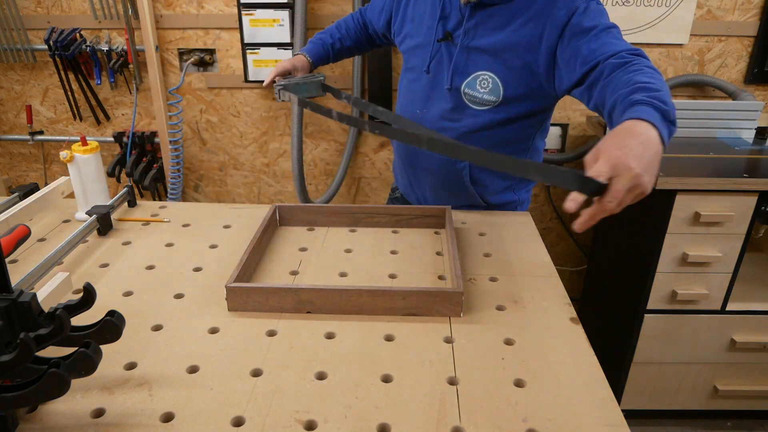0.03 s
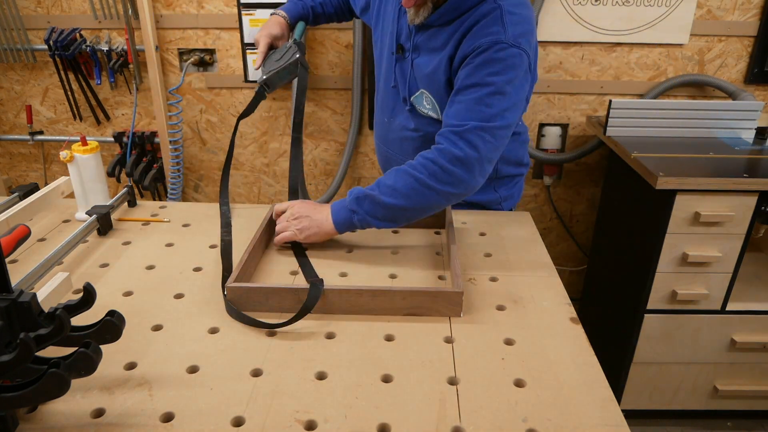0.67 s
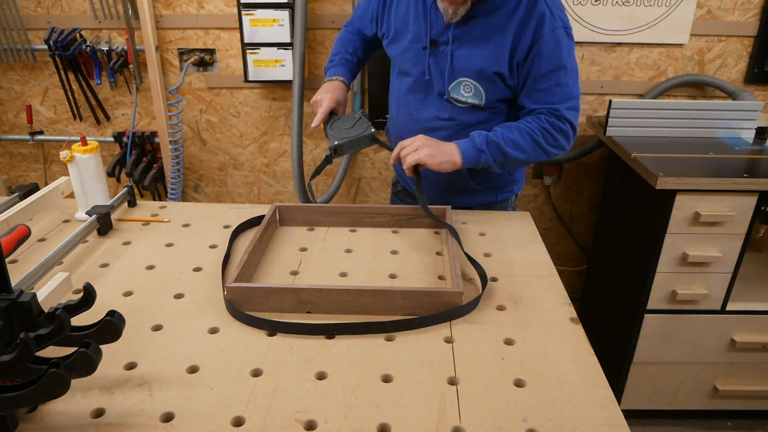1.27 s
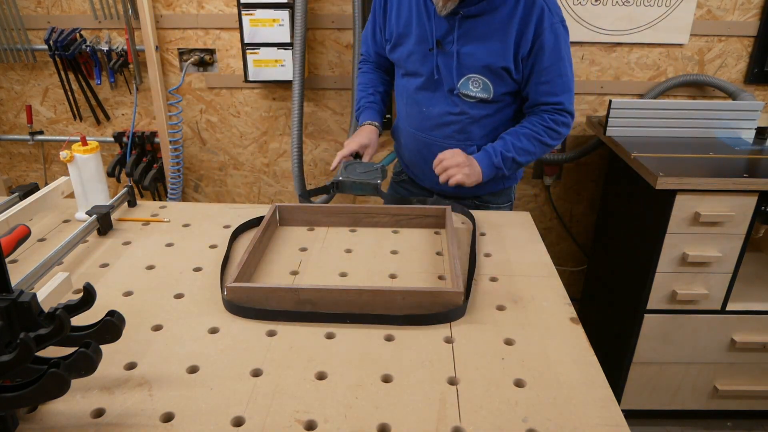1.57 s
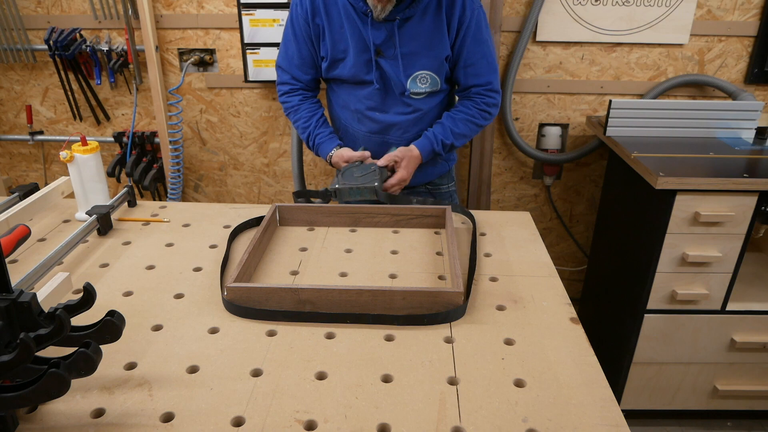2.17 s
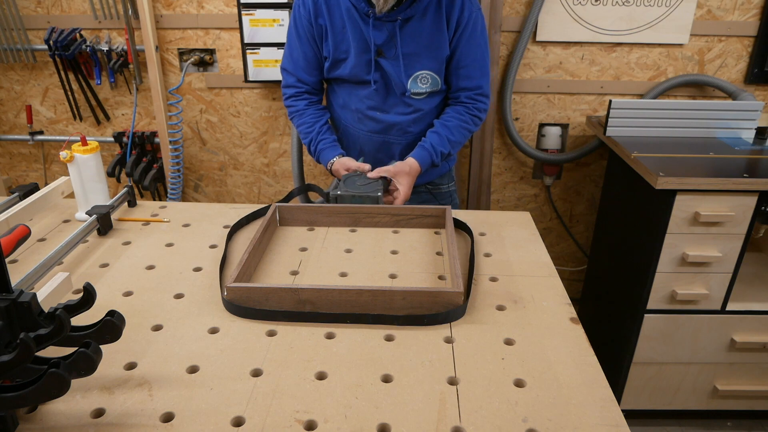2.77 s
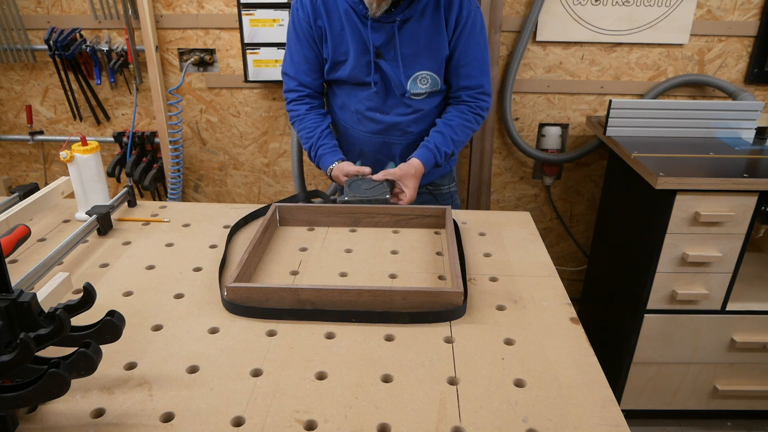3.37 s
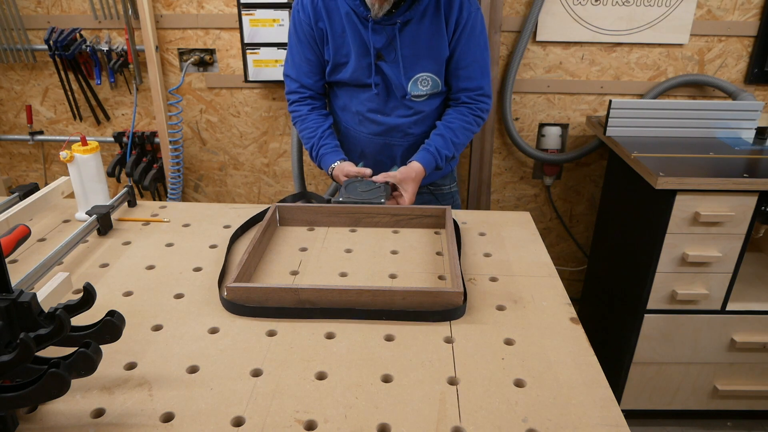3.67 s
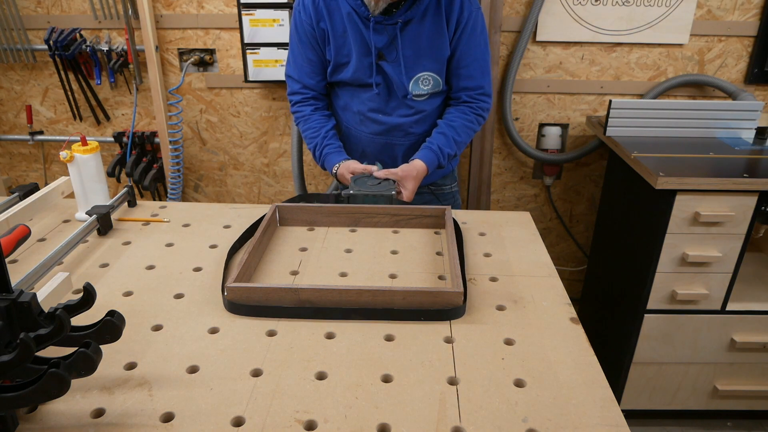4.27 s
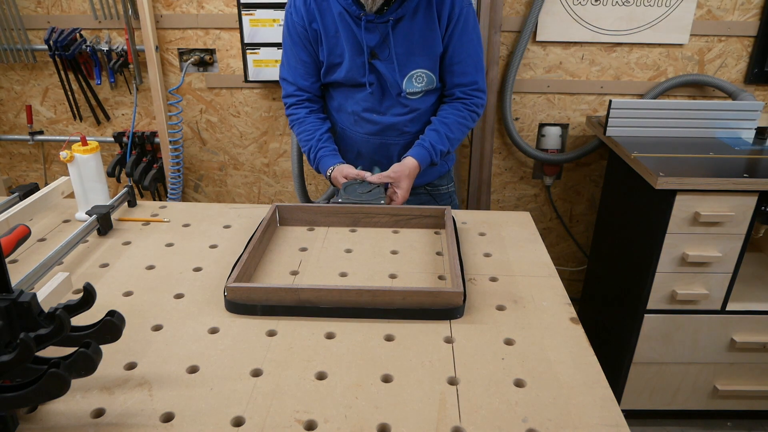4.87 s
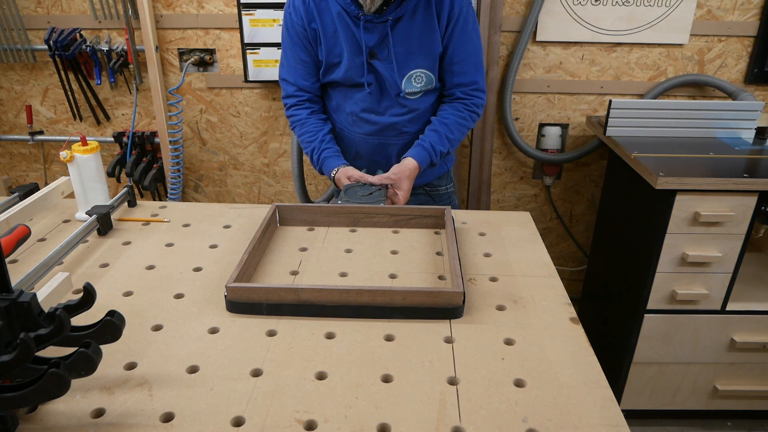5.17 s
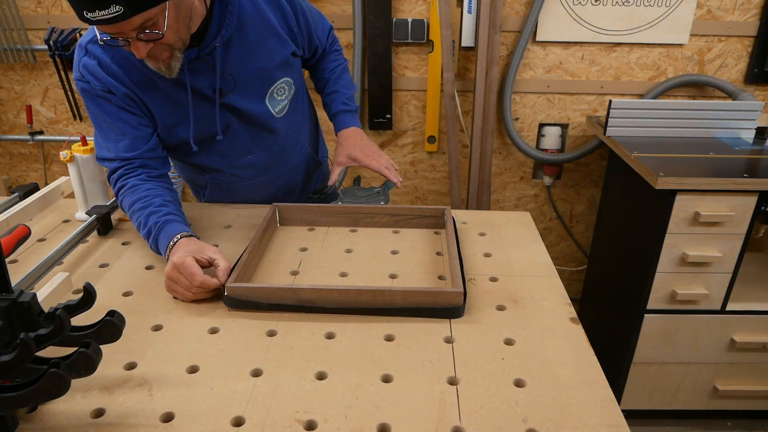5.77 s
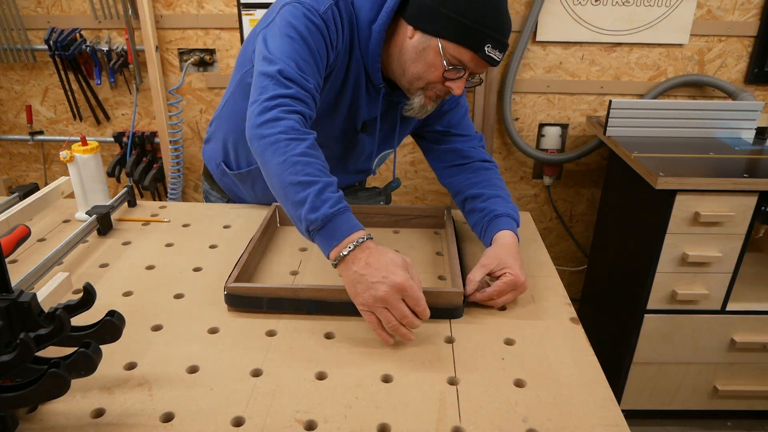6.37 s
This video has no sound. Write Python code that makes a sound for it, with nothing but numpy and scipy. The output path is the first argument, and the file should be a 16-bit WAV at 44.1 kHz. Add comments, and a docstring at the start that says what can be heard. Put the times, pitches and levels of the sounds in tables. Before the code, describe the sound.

A strap swishes around a wooden frame, then a plastic ratchet tightens it with rapid, slowing clicks and light wooden knocks.

```python
"""A strap clamp is tightened round a glued wooden frame, heard from close by in a small workshop.
First sleeves rustle, the strap slides and swishes, and hands pat the wood. After about two seconds
the ratchet winds the strap in: its pawls (small catches) snap over teeth in a fast rattle that slows
as the strap tightens, while the frame drags and knocks on the bench. Then single clicks lock the
clamp, the frame knocks once more, a corner block is tapped against it, and hands pat it again."""
import sys
import numpy as np
from scipy import signal
from scipy.fft import rfft, irfft, next_fast_len
from scipy.io import wavfile

SR = 44100
rng = np.random.default_rng(int(sys.argv[2]) if len(sys.argv) > 2 else 0)


def transcribe(u):
    """Save the signal u as a 16-bit wav file named by the first command-line argument.

    u: samples, shape (n,) or (channels, n), limited to [-1, 1]; the rate is SR.
    q: integer samples, one column per channel.
    """
    v = np.clip(np.atleast_2d(u).T, -1, 1)
    q = np.round(v * 32767).astype(np.int16)
    wavfile.write(sys.argv[1], SR, q)


N = 283541

# The spool winds the strap in, in two runs. One list for each run: time_s, turns_made
SPOOL_RUNS = [
    [(2.265, 0), (2.355, 1), (2.429, 2), (2.661, 5), (2.746, 6), (2.821, 7), (3.039, 10), (3.11, 10.98)],
    [(3.251, 0), (3.405, 2), (3.562, 4), (3.861, 8), (4.18, 12), (4.265, 13), (4.357, 14), (4.464, 15),
     (4.591, 16)],
]
# Every turn trips the pawls in the same order, a loose three and a tight pair: share_of_turn, level_db
TEETH_PER_TURN = [(-0.085, -5), (0, 1.5), (0.115, -2.5), (0.49, -2.5), (0.538, -2.5)]
# The force of the winding, as the energy of a snap: time_s, level_db
WINDING_FORCE = [(2.26, -5), (2.65, -9), (3.1, -11), (3.7, -12), (4.3, -12), (4.75, -12)]
# Single snaps as the clamp is handled, stalls and is locked: start_s, level_db
SINGLE_SNAPS = [(1.62, -27), (1.854, -26.5), (1.9772, -14.5), (2.026, -16), (2.034, -6.5), (2.1139, -7),
                (2.18, -21), (2.221, -15), (3.1225, -9), (3.172, -26), (3.2274, -12), (4.612, -11),
                (4.6591, -11), (4.6628, -11.5), (4.7404, -9.5), (4.8407, -9), (4.9012, -14.5),
                (4.9101, -12.5), (5.0349, -6), (5.1524, -7.5), (5.2038, -7.5), (5.2313, -10.5),
                (5.507, -22)]
# The tones of a snap in the plastic clamp (ring_s is the time to fade by 60 dB): pitch_hz, level_db, ring_s
PAWL_TONES = [(1900, -23, 0.0023), (2080, -12.5, 0.0037), (3284, -2.5, 0.0025), (4905, -0.5, 0.0027),
              (5770, 3.5, 0.0016), (6510, -5, 0.0047), (7940, -6.5, 0.00068), (10200, -4.5, 0.0013),
              (13060, -14.5, 0.0021), (13900, -6, 0.0012)]
# The snaps grow brighter and duller over time: time_s, treble_lift_db_per_octave
SNAP_BRIGHTNESS = [(2.0, -3.5), (2.6, 1.5), (3.4, 0), (4.3, -1), (4.8, 2.5), (5.2, 1)]
# The longer ring of the clamp's housing: pitch_hz, level_db, ring_s
HOUSING_TONES = [(1514, -48, 0.055), (2210, -41, 0.034), (3211, -40, 0.05), (3466, -41, 0.06),
                 (3550, -40.5, 0.06), (3666, -39, 0.06), (3757, -40, 0.06), (5243, -39, 0.03),
                 (5492, -39, 0.03), (6400, -39, 0.035)]
# A pawl scraping up a tooth. Each _NOISE table gives the shape of a noise: pitch_hz, level_db
SCRAPE_NOISE = [(400, -18.5), (2000, 6.5), (5500, 5), (8000, 5.5), (16000, -6)]

# The frame jumps and knocks on the bench: start_s, level_db
FRAME_KNOCKS = [(2.422, -36.5), (2.449, -41.5), (2.493, -35.5), (2.511, -46), (2.573, -41), (2.623, -43),
                (2.831, -41.5), (2.901, -46.5), (2.927, -44), (3.337, -43.5), (3.414, -47), (3.756, -53.5),
                (5.279, -36)]
# Hands and strap land softly on frame and bench: start_s, thud_db, slap_db
SOFT_PATS = [(0.504, -53.5, -43.5), (0.553, -52.5, -59), (0.604, -72, -54), (0.635, -56.5, -52),
             (0.948, -75, -50), (1.541, -73, -48.5), (1.773, -64, -65), (5.507, -54, -46),
             (6.115, -48.5, -62), (6.14, -54, -52.5), (6.184, -58, -56)]
# A corner block is set against the frame: start_s, level_db
BLOCK_TAPS = [(5.706, -58), (5.724, -58.5), (5.796, -50)]
# Dull bumps against the bench: start_s, level_db
BENCH_BUMPS = [(0.551, -63), (5.368, -61), (6.024, -61)]
# The tones that frame, bench top and block ring with: pitch_hz, level_db, ring_s
FRAME_TONES = [(236.8, -20, 0.31), (495.3, -5, 0.08), (775, -12, 0.17), (925, -14, 0.22), (1004, -2, 0.13),
               (1240, -10, 0.071), (1403, 1.5, 0.054), (1654, 2, 0.049), (2058, -2, 0.041),
               (2320, -4, 0.047), (2510, -27, 0.06), (2820, -17, 0.04)]
BENCH_TONES = [(177, -1.5, 0.03), (260.5, -4, 0.048), (348, -0.5, 0.078), (440, -4.5, 0.052),
               (655, 0, 0.12)]
BLOCK_TONES = [(735, -12, 0.24), (963, -1.5, 0.11), (1110, -17, 0.077), (1400, 5.5, 0.037),
               (1840, 2, 0.017), (2730, -7, 0.046)]
# The noisy parts of these hits: pitch_hz, level_db
FRAME_NOISE = [(400, -41), (750, -5), (1400, -2), (2200, 4), (3000, -10), (5000, -15)]
THUD_NOISE = [(110, -45), (240, -14), (480, 6.5), (700, -18), (1400, -11)]
CRACK_NOISE = [(1800, 0), (3000, -6.5), (4000, -2), (6000, -5), (16000, -26.5)]
SCUFF_NOISE = [(700, 4), (1400, 2), (2800, -10), (5000, -17), (8200, -9), (10000, -16)]
BUMP_NOISE = [(90, -16), (140, 8), (300, -6)]
# The strap drags the frame over the bench: time_s, level_db
FRAME_DRAG = [(2.38, -100), (2.45, -58), (2.6, -50.5), (2.72, -78), (2.84, -59.5), (2.97, -61.5),
              (3.2, -76.5), (3.33, -61.5), (3.5, -72.5), (3.87, -66), (4.08, -82), (4.5, -102)]

# Sleeves brush as the arms move: time_s, level_db
ARM_MOVES = [(0.0, -62.5), (0.27, -63.5), (0.37, -70.5), (0.62, -61.5), (0.76, -66.5), (1.0, -66.5),
             (1.13, -62.5), (1.5, -67.5), (1.72, -61.5), (2.4, -67), (3.1, -76), (5.15, -76.5), (5.32, -66),
             (5.64, -71.5), (5.86, -73.5), (6.02, -61.5), (6.42, -70)]
# The strap is drawn through the housing and whistles when fast: start_s, length_s, slide_db, whistle_db
STRAP_SLIDES = [(0.0, 0.11, -56.5, -58), (0.573, 0.14, -62, -68), (0.787, 0.092, -57.5, -75),
                (0.954, 0.027, -66, -70), (1.08, 0.19, -63.5, -60.5), (1.402, 0.065, -59.5, -84),
                (1.684, 0.15, -56.5, -58.5), (1.913, 0.16, -55.5, -66.5), (5.508, 0.081, -70, -61.5)]
# The strap is swept over hands and bench: start_s, length_s, level_db
STRAP_SWISHES = [(0.0, 0.096, -63), (0.235, 0.016, -57), (0.47, 0.062, -54), (0.58, 0.13, -62),
                 (0.86, 0.022, -62), (1.07, 0.034, -55), (1.19, 0.074, -57.5), (1.34, 0.021, -60),
                 (1.38, 0.029, -55), (1.57, 0.07, -58.5), (1.71, 0.14, -59.5), (2.15, 0.16, -59),
                 (5.41, 0.11, -56.5), (5.69, 0.044, -67.5), (6.01, 0.24, -63)]
# The rubbing noises: pitch_hz, level_db
SLEEVE_NOISE = [(100, -15.5), (170, -6.5), (300, 0), (600, 1), (1200, 2), (1700, 0.5), (3000, -20)]
SLIDE_NOISE = [(1200, -19), (1900, -9), (2290, 2.5), (2850, -7), (3350, -4), (3700, -1.5), (4400, -13),
               (5500, -12.5), (6250, -18), (7050, -14), (7900, -24)]  # the hollow ring of the housing as the strap slides through
WHISTLE_NOISE = [(5000, -12), (5520, -4.5), (6200, -11), (6750, -13), (7100, 1.5), (7650, -16)]  # the weave running over an edge
SWISH_NOISE = [(3500, -6.5), (4800, -4), (5500, -3.5), (6200, -3), (7050, -1), (7900, -2.5), (10000, -4.5),
               (16000, -11)]

# How long the echo lasts, before workshop() holds it between 0.09 and 0.25 s: pitch_hz, ring_s
ECHO_LENGTH = [(150, 2.5), (1000, -1.58), (3500, 0.13), (7000, 0.12), (15000, -0.03)]
# How strong the echo is: pitch_hz, level_db
ECHO_LEVEL = [(150, -18), (1000, -12.5), (3500, -7.5), (6000, -16), (10000, -6), (15000, -6.5)]
# The faint steady background: pitch_hz, level_db
BACKGROUND_NOISE = [(25, -5), (60, -22), (150, 12), (400, 7), (1000, 0), (3000, -13), (16000, -4)]

TOOTH_JITTER_S, TOOTH_VARY_DB = 0.0006, 1.65  # chance changes from tooth to tooth
BOUNCE_S, BOUNCE_DB = 0.0024, -14  # the usual delay and level of a bounce, next to its snap
FRAME_RING_DB, BENCH_RING_DB = -4.5, -6  # ringing tones, next to the noisy part of a hit
ARM_STRAP_DB, ARM_SWISH_DB = -3, -3.5  # the strap in the hands moves with the arms
RUN_STRAP_DB, RUN_SWISH_DB = -62, -58.5  # hiss of the strap running onto the spool...
RUN_TURNS_PER_S, RUN_FORCE_DB = 13, -10  # ...at this speed and winding force
HISS_DB_PER_FORCE_DB = 1.86
STROKE_RISE_S, STROKE_FALL_S = 0.015, 0.0096
CUTOFF_HZ = 16000


def ratchet(housing_db, bass_below_hz, bass_loss):
    """The pawls scrape and snap, and the housing rings. So small a body gives off little bass."""
    contacts = pawl_contacts()
    times, levels_db = np.transpose(contacts)
    pawl = pawl_snaps(contacts, vary_db=3.5, detune=0.045, close_s=0.00044)
    pawl += pawl_scrapes(contacts, scrape_db=-27.5, gap_share=0.32, slow_softening=1.43)
    bass = signal.sosfilt(signal.butter(1, bass_below_hz, fs=SR, output="sos"), pawl)
    housing = struck(times, levels_db + housing_db, HOUSING_TONES, vary_db=5.5)
    jolts = clamp_jolts(times, levels_db, jolt_db=-20, top_hz=132)
    return pawl - bass_loss * bass + housing + jolts


def pawl_contacts():
    """A pawl snaps at each passing tooth and bounces once. With the single snaps: start_s, level_db."""
    passing = []
    for run in SPOOL_RUNS:
        run_s, turns = np.transpose(run)
        for turn in range(int(turns[-1]) + 1):
            passing += [(np.interp(turn + share, turns, run_s), db)
                        for share, db in TEETH_PER_TURN if 0 <= turn + share <= turns[-1]]
    times, tooth_db = np.transpose(passing)
    late, strong, flight = rng.standard_normal((len(times), 3)).T
    levels_db = np.interp(times, *np.transpose(WINDING_FORCE)) + tooth_db + TOOTH_VARY_DB * strong
    times = times + TOOTH_JITTER_S * late
    bounces = zip(times + BOUNCE_S * np.exp(flight / 2), levels_db + BOUNCE_DB)
    return sorted([*zip(times, levels_db), *bounces, *map(tuple, SINGLE_SNAPS)])


def pawl_snaps(contacts, vary_db, detune, close_s):
    """Each snap rings for a few milliseconds, with a brightness set by its time."""
    out, t = np.zeros(N), seconds(size=400)
    hz, db, ring_s = np.transpose(PAWL_TONES)
    luck = rng.standard_normal((len(contacts), 3, len(PAWL_TONES)))
    closing = 1 - dying(t + 1 / SR, close_s)  # the contact takes a moment to close
    for (start_s, energy_db), (strength, pitch, sign) in zip(contacts, luck):
        lift_db = np.interp(start_s, *np.transpose(SNAP_BRIGHTNESS)) * np.log2(hz)
        gains = from_db(db + lift_db + vary_db * strength) * np.sign(sign)
        tones = np.cos(2 * np.pi * np.outer(hz * (1 + detune * pitch), t)) * dying(t, ring_s[:, None])
        snap = gains @ tones * closing
        add(out, start_s, from_db(energy_db) * snap / np.linalg.norm(snap))
    return out


def pawl_scrapes(contacts, scrape_db, gap_share, slow_softening):
    """The pawl scrapes up each tooth before it drops: longer and softer when the wheel turns slowly."""
    out = np.zeros(N)
    for (before_s, _), (snap_s, db) in zip(contacts, contacts[1:]):
        climb_s = np.clip(gap_share * (snap_s - before_s), .004, .016)
        swell = np.linspace(0, 1, round(climb_s * SR))
        softening = (.004 / climb_s) ** slow_softening
        add(out, snap_s - climb_s, from_db(db + scrape_db) * swell * softening)
    return out * noise(SCRAPE_NOISE) * from_db(3 * drift(700))


def clamp_jolts(times, levels_db, jolt_db, top_hz):
    """Each snap jolts the whole clamp in the hands: a faint low puff."""
    low_band = signal.butter(2, [35, top_hz], "band", fs=SR, output="sos")
    return signal.sosfilt(low_band, pushes(times, levels_db + jolt_db) + 1e-18)


def wood_knocks(thud_db, crack_db, pat_wood_db, scuff_db, lowest_hz):
    """Hard knocks, soft pats and block taps give off no deep bass. Dull bumps sound below them."""
    times, knock_db = np.transpose(FRAME_KNOCKS)
    knocks = wood_hits(times, knock_db, knock_db + thud_db, knock_db + crack_db)
    times, pat_db, slap_db = np.transpose(SOFT_PATS)
    pats = wood_hits(times, pat_db + pat_wood_db, pat_db, slap_db)
    times, tap_db = np.transpose(BLOCK_TAPS)
    taps = struck(times, tap_db, BLOCK_TONES, vary_db=3.5)
    taps += bursts(times, tap_db + scuff_db, fade_s=0.07) * noise(SCUFF_NOISE)
    bumps = bursts(*np.transpose(BENCH_BUMPS), fade_s=0.14) * noise(BUMP_NOISE)
    bass_cut = signal.butter(2, lowest_hz, "high", fs=SR, output="sos")
    return bumps + signal.sosfilt(bass_cut, knocks + pats + taps)


def wood_hits(times, frame_db, thud_db, crack_db):
    """A hit makes the frame ring and the bench top thud, with a short crack where it lands."""
    frame = struck(times, frame_db + FRAME_RING_DB, FRAME_TONES, vary_db=2.5)
    frame += bursts(times, frame_db, fade_s=0.1) * noise(FRAME_NOISE)
    bench = struck(times, thud_db + BENCH_RING_DB, BENCH_TONES, vary_db=5.0)
    bench += bursts(times, thud_db, fade_s=0.11) * noise(THUD_NOISE)
    crack = bursts(times, crack_db, fade_s=0.063) * noise(CRACK_NOISE)
    return frame + bench + crack


def frame_dragging():
    """The frame judders over the bench top, and the tiny slips keep it ringing."""
    slips = rng.standard_normal(N) * from_db(4 * drift(200))
    wood = sum((-1) ** k * from_db(db) * ring(slips, hz, ring_s) / np.sqrt(hz)
               for k, (hz, db, ring_s) in enumerate(FRAME_TONES))
    moving = (seconds(N) > FRAME_DRAG[0][0]) & (seconds(N) < FRAME_DRAG[-1][0])
    return moving * from_db(over_time(FRAME_DRAG)) * rms_one(wood)


def strap_and_sleeves():
    """Sleeves brush, and the strap slides, whistles and swishes, moved by hand or by the spool."""
    arms = from_db(over_time(ARM_MOVES))
    turns_per_s = sum(np.gradient(over_time(run)) * SR for run in SPOOL_RUNS)
    pull_db = HISS_DB_PER_FORCE_DB * (over_time(WINDING_FORCE) - RUN_FORCE_DB)
    running = turns_per_s / RUN_TURNS_PER_S * from_db(pull_db)
    start_s, length_s, slide_db, whistle_db = np.transpose(STRAP_SLIDES)
    hand_pulls = strokes(zip(start_s, length_s, slide_db))
    whistling = strokes(zip(start_s, length_s, whistle_db))
    sliding = together(hand_pulls, arms * from_db(ARM_STRAP_DB), running * from_db(RUN_STRAP_DB))
    swishing = together(strokes(STRAP_SWISHES), arms * from_db(ARM_SWISH_DB),
                        running * from_db(RUN_SWISH_DB))
    return (arms * friction(SLEEVE_NOISE, grain_db=2.0)
            + sliding * friction(SLIDE_NOISE, grain_db=3.0)
            + whistling * friction(WHISTLE_NOISE, grain_db=0)
            + swishing * friction(SWISH_NOISE, grain_db=2.5))


def friction(spectrum, grain_db):
    """Fibres catch and let go: noise in fine grains, under a slightly uneven pressure."""
    uneven_db = grain_db * drift(900) + 1.4 * drift(70)
    return noise(spectrum) * rms_one(from_db(uneven_db))


def workshop(sound, build_up_s, bands=8):
    """Sound bounces off bench and walls as a short, dense echo that lasts longest in the bass."""
    t = seconds(size=12000)
    edges, echo = np.geomspace(80, 17000, bands + 1), 0
    for low, high in zip(edges, edges[1:]):
        hz = np.sqrt(low * high)
        band_filter = signal.butter(3, [low, high], "band", fs=SR, output="sos")
        band = signal.sosfilt(band_filter, rng.standard_normal(len(t)))
        ring_s = np.clip(at_hz(ECHO_LENGTH, hz), .09, .25)
        shape = dying(t, ring_s) * (1 - np.exp(-(t / build_up_s) ** 2))
        echo = echo + band * shape / np.linalg.norm(shape) * from_db(at_hz(ECHO_LEVEL, hz))
    fade_out = np.cos(np.pi / 2 * t / t[-1])
    return signal.fftconvolve(sound, echo * fade_out)[:N]


def struck(times, levels_db, tones, vary_db):
    """Each hit sets each tone of an object ringing with a strength of its own."""
    luck = rng.standard_normal((len(times), len(tones)))
    return sum((-1) ** k * ring(pushes(times, levels_db + db + vary_db * luck[:, k]), hz, ring_s)
               for k, (hz, db, ring_s) in enumerate(tones))


def pushes(times, levels_db):
    """One sharp push, a single sample long, at each time."""
    out = np.zeros(N)
    out[np.round(times * SR).astype(int)] = from_db(levels_db)
    return out


def ring(force, hz, ring_s):
    """A push of size 1 starts a fading tone of height 1."""
    keep, step = dying(1 / SR, ring_s), 2 * np.pi * hz / SR
    return signal.lfilter([0, np.sin(step)], [1, -2 * keep * np.cos(step), keep * keep], force + 1e-18)


def bursts(times, levels_db, fade_s):
    """A loudness curve that jumps up at each hit and dies away. A longer fade also rises more slowly."""
    out, t = np.zeros(N), seconds(size=6000)
    shape = dying(t, fade_s) - dying(t, fade_s / 50)
    for start_s, db in zip(times, levels_db):
        add(out, start_s, from_db(db) * shape)
    return out


def strokes(rows):
    """A loudness curve for rubbing strokes: each swells, holds and fades."""
    out, t = np.zeros(N), seconds(N)
    for start_s, length_s, db in rows:
        rise = np.clip((t - start_s) / STROKE_RISE_S + .5, 0, 1)
        fall = np.clip(1 - (t - start_s - length_s) / STROKE_FALL_S, 0, 1)
        out += from_db(db) * rise * fall
    return out


def together(*curves):
    """Unrelated noises add in power, so their loudness curves add as squares."""
    return np.sqrt(sum(curve ** 2 for curve in curves))


def noise(spectrum):
    """Steady noise shaped by a table, falling away beyond the table's lowest and highest pitch."""
    white = rng.standard_normal(next_fast_len(N))
    hz = np.fft.rfftfreq(len(white), 1 / SR) + 1
    ends = (np.minimum(hz / spectrum[0][0], 1) * np.minimum(spectrum[-1][0] / hz, 1)) ** 3
    shaped = rfft(white) * from_db(at_hz(spectrum, hz)) * ends
    return rms_one(irfft(shaped, len(white)))[:N]


def drift(changes_per_s):
    """A curve that wanders by chance, with a typical size of 1."""
    points = rng.standard_normal(8192)
    return rms_one(np.interp(seconds(N) * changes_per_s, np.arange(len(points)), points))


def add(out, start_s, sound):
    """Mix a sound in from start_s on."""
    start = max(round(start_s * SR), 0)
    out[start:start + len(sound)] += sound[:max(N - start, 0)]


def at_hz(rows, hz):
    """Read a table at any pitch, with every octave equally wide."""
    pitches, values = np.transpose(rows)
    return np.interp(np.log(np.maximum(hz, 1)), np.log(pitches), values)


def over_time(rows):
    """Join a table's points with straight lines, one value for each sample."""
    return np.interp(seconds(N), *np.transpose(rows))


def dying(t, fade_s):
    """A fade that drops 60 dB every fade_s seconds."""
    return np.exp(-np.log(1000) * t / fade_s)


def rms_one(x):
    """Scale a signal to an average strength (rms) of 1."""
    return x / np.sqrt(np.mean(x ** 2) + 1e-20)


def from_db(db):
    return 10 ** (np.asarray(db) / 20)


def seconds(size):
    return np.arange(size) / SR


def scene():
    """Everything is heard from one close spot, so left and right are nearly alike."""
    direct = (ratchet(housing_db=-4.5, bass_below_hz=960, bass_loss=0.69)
              + wood_knocks(thud_db=-17.5, crack_db=1, pat_wood_db=1.5, scuff_db=-1, lowest_hz=115)
              + frame_dragging() + strap_and_sleeves())
    middle = direct + workshop(direct, build_up_s=0.0021) + from_db(-90) * noise(BACKGROUND_NOISE)
    side = from_db(-47.5) * workshop(direct, build_up_s=0.0014)
    side += from_db(-93.5) * noise(BACKGROUND_NOISE)
    return np.array([middle + side, middle - side])


def record(dry):
    """The very highest treble is cut off steeply."""
    return signal.sosfilt(signal.ellip(10, .1, 80, CUTOFF_HZ, fs=SR, output="sos"), dry)


dry = scene()
out = record(dry)
transcribe(out)
```